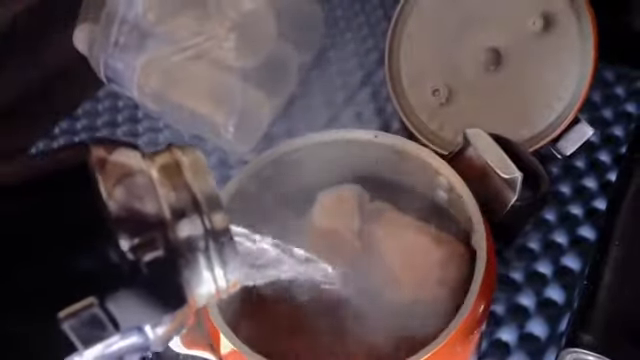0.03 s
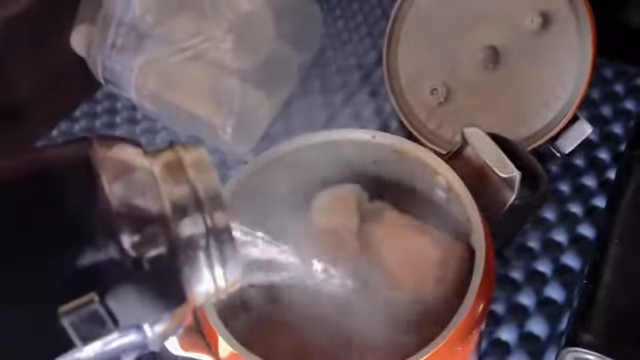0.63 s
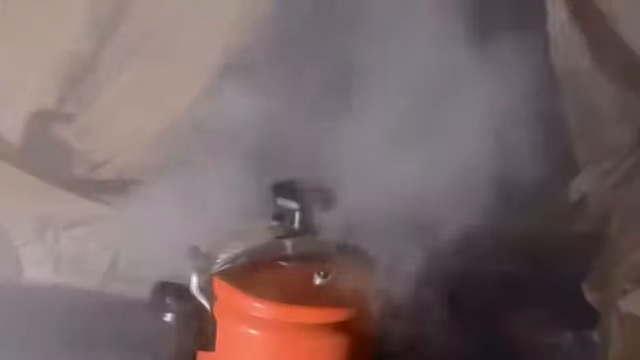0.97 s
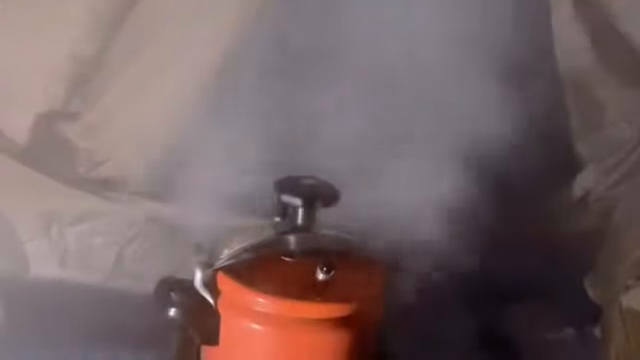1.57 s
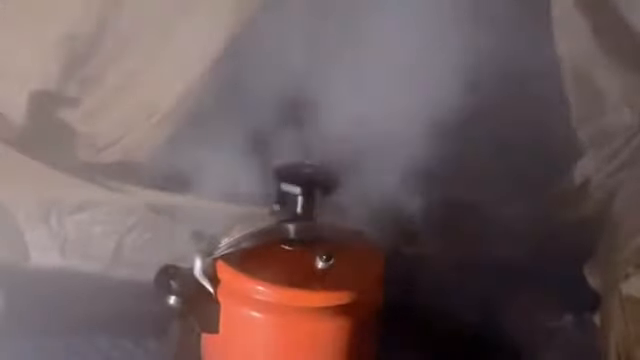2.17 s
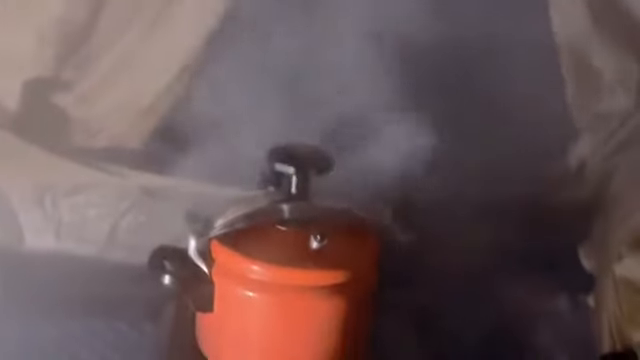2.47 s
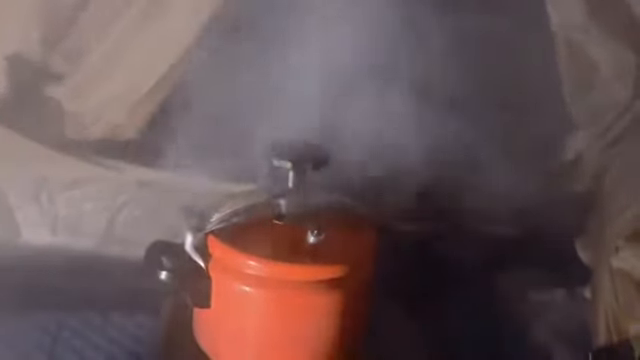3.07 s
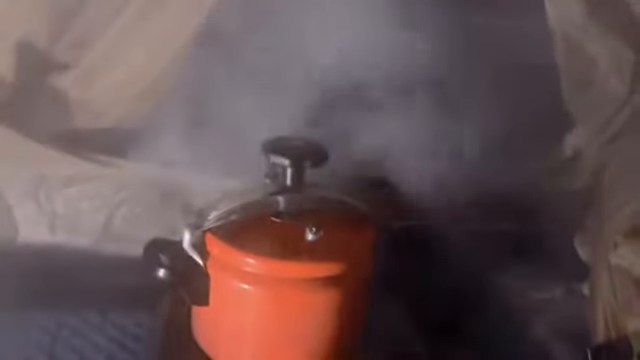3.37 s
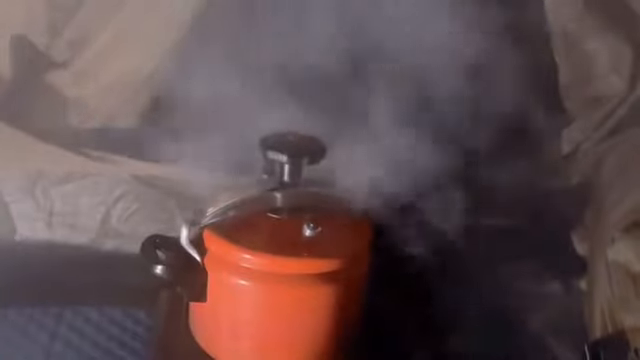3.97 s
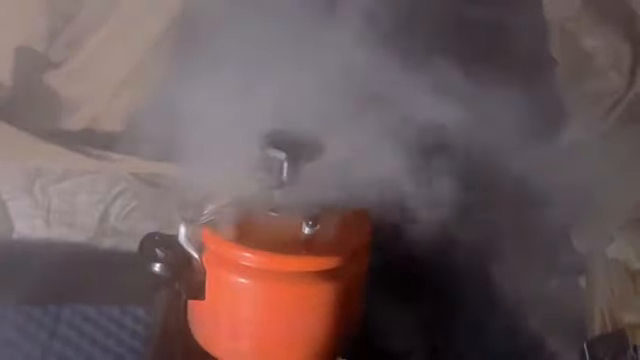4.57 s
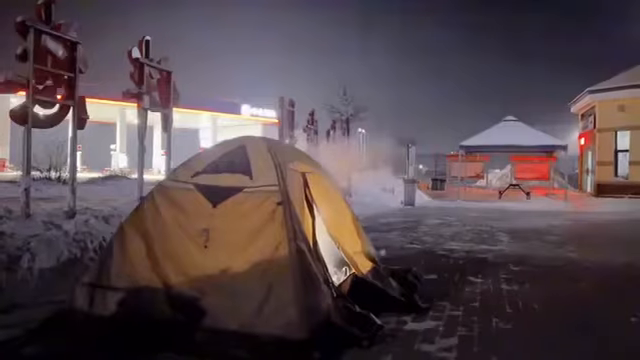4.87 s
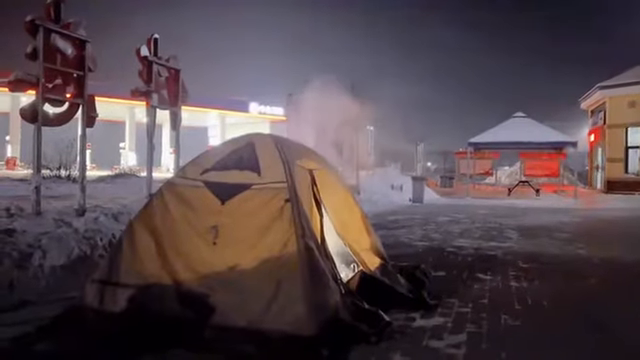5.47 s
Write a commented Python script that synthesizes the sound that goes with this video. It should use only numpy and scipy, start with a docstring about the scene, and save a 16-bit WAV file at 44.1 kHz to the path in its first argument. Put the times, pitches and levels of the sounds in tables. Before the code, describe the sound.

A brief pour of water splashes and bubbles into a pot on a rumbling stove, close to the microphone. It switches abruptly to the main sound, a sharp steam hiss from a pressure cooker inside a tent, pulsing unevenly as the valve weight rocks, with small wet sputters. The last second cuts outdoors to an uneven low throb, a wash like far traffic and a thin, wavering hiss.

```python
"""A small pressure cooker on a winter camp stove, heard close up, in three shots with hard cuts.
Water glugs and spatters into the open pot, its bubbles ringing over the stove's rumble.
The closed cooker then vents a bright, fluttering jet of steam under its weighted valve.
Last, the microphone is in the open air outside the tent: a low throb, a wash like distant
traffic and a faint hiss."""
import sys
import numpy as np
from scipy import signal
from scipy.fft import rfft, irfft, next_fast_len
from scipy.io import wavfile
from scipy.ndimage import uniform_filter1d, map_coordinates

SR = 44100
rng = np.random.default_rng(int(sys.argv[2]) if len(sys.argv) > 2 else 0)


def output_pcm(signal):
    """Save a mono or channel-first signal as 16-bit PCM at the path in sys.argv[1].

    Samples are clipped to [-1, 1] before scaling.
    """
    pcm = np.clip(np.atleast_2d(signal).T, -1, 1) * 32767
    wavfile.write(sys.argv[1], SR, np.round(pcm).astype(np.int16))


N = 242971
VENT_S, OUTSIDE_S = .8435, 4.732  # the two cuts
TOP_HZ = 13080
MID_ONLY = np.array([[1], [0]])

# resonances of the open pot and its water: pitch_hz, width_hz, level_db
POT_MODES = [(533, 42, 2.5), (710, 41, 4), (812, 80, -2), (1295, 51, 3), (1750, 69, -17), (2330, 42, -5),
             (2740, 55, -3.5), (3860, 440, -16.5)]


def amp(db):
    """Decibels to gain."""
    return 10 ** (np.asarray(db) / 20)


def unit(x):
    """Scale to rms 1."""
    return x / np.sqrt(np.mean(x ** 2) + 1e-20)


def clock():
    """The time of each sample."""
    return np.arange(N) / SR


def along(points, hz):
    """Interpolate (freq_hz, value) points on a log axis."""
    freqs, values = np.transpose(points)
    return np.interp(np.log(hz + 1), np.log(freqs + 1), values)


def curve(points):
    """Interpolate (time_s, value) points at every sample."""
    return np.interp(clock(), *np.transpose(points))


def swell(s, half_s):
    """A bell-shaped rise and fall around time s."""
    return np.exp(-((clock() - s) / half_s) ** 2)


def wobble(rate):
    """A smooth random curve, rate knots a second."""
    return map_coordinates(rng.standard_normal(int(N * rate / SR) + 4), [clock() * rate])


def noise():
    """Two unrelated white noises: mid and side."""
    return rng.standard_normal((2, N))


def filtered(x, response):
    """x times a response of frequency."""
    size = next_fast_len(N + SR // 2)
    return irfft(rfft(x, size) * response(np.fft.rfftfreq(size, 1 / SR)), size)[..., :N]


def coloured_noise(spectrum):
    """Mid and side noise shaped by (freq_hz, level_db) points, at rms 1."""
    return unit(filtered(noise(), lambda hz: amp(along(spectrum, hz)) * (hz < TOP_HZ)))


def resonate(x, modes):
    """x rung through (pitch_hz, width_hz, level_db) resonances, at rms 1."""
    return unit(filtered(x, lambda hz: sum(
        amp(db) * 1j * hz * width / (pitch ** 2 - hz ** 2 + 1j * hz * width)
        for pitch, width, db in modes)))


def steadied(x, span_s):
    """Even out swells slower than span_s."""
    power = uniform_filter1d(np.abs(signal.hilbert(x)) ** 2, max(int(span_s * SR), 1), axis=-1)
    return unit(x / np.sqrt(np.abs(power) + 1e-6))


def patchy(x, depth, size, blur):
    """Lay random patches of gain over x in time and frequency; depth is (freq_hz, depth_db)."""
    hz, _, spectra = signal.stft(x, SR, nperseg=size)
    field = uniform_filter1d(rng.standard_normal(spectra.shape[1:]), size=2, axis=0)
    field = unit(uniform_filter1d(uniform_filter1d(field, blur, axis=1), blur, axis=1))
    gain = amp(along(depth, hz)[:, None] * np.minimum(field, 1))
    gain /= np.sqrt(np.mean(gain ** 2, axis=1, keepdims=True))
    return signal.istft(spectra * gain, nperseg=size)[1][..., :N]


def spread(pair, width):
    """Mid and side to left and right; width is (freq_hz, side_gain_db)."""
    side = filtered(pair[1], lambda hz: amp(along(width, hz)))
    return np.array([pair[0] + side, pair[0] - side])


def leaned(pair, lean):
    """Tilt left against right by (freq_hz, left_minus_right_db) points."""
    return filtered(pair, lambda hz: amp(np.outer([.5, -.5], along(lean, hz))))


def add(track, s, sound):
    """Mix a sound in at time s."""
    part = track[..., max(round(s * SR), 0):][..., :sound.shape[-1]]
    part += sound[..., :part.shape[-1]]


def stove():
    """The stove rumbles unevenly under the open pot."""
    # the rumble's course: time_s, level_db
    rumble = [(0.0, -19), (0.314, -19), (0.36, -10), (0.466, -20.5), (0.576, -13.5), (0.69, -22.5),
              (0.71, -18), (0.84, -18.5)]
    # its colour: freq_hz, level_db
    spectrum = [(13, -43), (22, -24), (64, 4.5), (135, -15.5), (198, -16), (256, -16.5), (294, -16),
                (353, -22), (420, -22), (550, -25), (920, -120)]
    return amp(curve(rumble) + 1.9 * wobble(44)) * steadied(coloured_noise(spectrum), span_s=.032)


def vessel(hum_db=-27.5):
    """The air in the pouring vessel rings at one main pitch and swells with each gulp."""
    # the tone rises between gulps: time_s, pitch_hz
    pitch = [(.18, 290), (.225, 317), (.27, 293), (.46, 301.5), (.495, 292), (.555, 315), (.615, 292.6),
             (.735, 303.4), (.79, 291.4)]
    # gulps of air: time_s, level_db, half_length_s
    gulps = [(0.285, -13, 0.027), (0.408, -11.5, 0.072), (0.622, -7, 0.042), (0.745, -9.5, 0.014),
             (0.779, -10, 0.019), (0.836, -12, 0.018)]
    # the vessel's hollow: pitch_hz, width_hz, level_db
    modes = [(238, 13, 4), (294, 26, 5.5), (310, 3.3, -14)]
    tone = np.sin(2 * np.pi * np.cumsum(curve(pitch) + 3 * wobble(39.7)) / SR) * MID_ONLY
    breath = amp(-14) * steadied(resonate(noise(), modes), span_s=.024)
    level = amp(hum_db) + sum(amp(db - 6) * swell(s, half_s) for s, db, half_s in gulps)
    return level * (tone + breath)


def droplets(per_s, centre_hz, cycles, scatter_db, samples=400):
    """A random patter of tiny bubbles, each ringing for a few cycles; mid and side."""
    t = np.arange(samples) / SR
    when, size, place, tone = rng.random((int(per_s * VENT_S), 4)).T[..., None]
    hz = np.clip(centre_hz * 4 ** (tone - .5), 100, TOP_HZ)
    life = np.exp(-hz * t / cycles) * np.tanh(hz * t / 4) ** 2
    rings = amp(-scatter_db * np.log(size + .024)) * np.sin(2 * np.pi * hz * t) * life
    index = ((when * VENT_S * SR).astype(int) + np.arange(samples)).ravel()
    side_gain = 2 * np.sin(2 * np.pi * place)
    pair = np.array([np.bincount(index, (rings * gain).ravel(), N) for gain in (1, side_gain)])
    return pair / np.std(pair[0, :int(VENT_S * SR)])


def stream():
    """The falling water churns the pot and throws up a fizzing spray."""
    # the stream builds up and slackens: time_s, flow_db
    flow = [(0, -2.5), (.18, -1), (.45, 1), (.62, 4), (.72, -2), (.84, -1)]
    # the fizz's colour: freq_hz, level_db
    spectrum = [(900, 4), (1900, 1.5), (2800, -2.5), (3400, -23), (4400, 2.5), (5700, -3), (7500, 2),
                (10000, -10.5), (12000, 4.5), (13000, -2.5)]
    churn = amp(-28.5) * resonate(noise() * amp(6.7 * np.tanh(wobble(130.6))), POT_MODES)
    plinks = amp(-5) * droplets(per_s=360, centre_hz=2722, cycles=23, scatter_db=-.5)
    glugs = amp(-32) * droplets(per_s=110, centre_hz=716, cycles=3.3, scatter_db=1, samples=1500)
    # clouds of fine bubbles come and go within milliseconds, each at its own pitch
    clouds = patchy(coloured_noise(spectrum), [(1500, 7.1), (5000, 7), (12000, 7)], size=128, blur=5)
    fizz = amp(3) * unit(clouds * amp(7.4 * np.tanh(wobble(108.6))))
    spray = amp(-33.5) * (plinks + fizz)
    return amp(curve(flow)) * (churn + glugs + spray)


def burst(hz, octaves, t60, rise_s=.0012):
    """A puff of noise around hz that swells quickly and dies; mid and side."""
    t = np.arange(SR // 4) / SR
    freqs = np.fft.rfftfreq(len(t), 1 / SR)
    band = 1 / (1 + (np.log2((freqs + 1) / hz) / octaves) ** 2)
    puff = unit(irfft(rfft(rng.standard_normal((2, len(t)))) * band, len(t)))
    return puff * amp(-60 * t / t60) * np.tanh(t / rise_s)


def cluster(hz, scatter_s=.0016, octaves=.4, cycles=12, rise=.05, count=16):
    """A handful of fine bubbles, born around the middle of 60 ms and rising in pitch; mid and side."""
    when, tone, place = rng.standard_normal((3, count, 1))
    age = np.maximum(np.linspace(-.03, .03, int(.06 * SR)) - scatter_s * when, 0)
    turns = age * np.minimum(hz * 2 ** (octaves * tone), TOP_HZ)
    phase = 2 * np.pi * turns * (1 + rise * np.tanh(turns / cycles))
    rings = np.sin(phase) * np.exp(-turns / cycles) * np.tanh(turns / 2)
    return np.array([rings.sum(0), (place * rings).sum(0)]) / np.std(rings.sum(0))


def splashes(hardness=.3, lag_s=.002):
    """A drop lands with a tick, louder the harder it hits, and drives fine bubbles under the surface."""
    # drops slapping the pot: time_s, level_db, bubble_pitch_hz
    drops = [(.0218, -25, 3216), (0.0458, -7.5, 4230), (0.1073, -8.5, 4030), (.123, -11.5, 4520),
             (0.142, -13.5, 4060), (.192, -15, 4300), (.2274, -14.5, 4680), (0.249, -3.5, 4150),
             (.259, -9.5, 4610), (.2987, -14, 4130), (0.344, -13, 5700), (0.3558, -8.5, 4360),
             (0.378, -21, 6000), (0.449, -16, 2890), (.455, -31, 4600), (0.5183, -12, 5310),
             (0.5466, -13, 3770), (.584, -18, 4660), (0.597, -10.5, 2960), (0.6713, -9, 4130),
             (0.725, -14.5, 6560), (.7517, -18, 4840), (0.7656, -2.5, 4760), (.79, -12.5, 2960)]
    out = np.zeros((2, N))
    typical_db = np.mean([db for _, db, _ in drops])
    for s, db, hz in drops:
        tick = burst(hz=6000, octaves=1.1, t60=.011, rise_s=.0008)
        add(out, s, amp(db - 8 + hardness * (db - typical_db)) * tick)
        fine = cluster(hz)
        add(out, s + lag_s - fine.shape[1] / SR / 2, amp(db - 23) * fine)
    return out


def bubbles(glide=-.042, attack_s=.0011):
    """Each pocket of air swells, rings and slides down in pitch, jostled by the stream."""
    # large bubbles: start_s, level_db, pitch_hz, t60_s
    pockets = [(.047, -7.5, 740, 0.01), (.052, -15, 1256, 0.046), (.103, -17, 890, 0.022),
               (.123, -14.5, 580, 0.022), (.1427, -9.5, 593, 0.024), (.1607, -14.5, 690, .022),
               (.164, -16, 1300, 0.033), (.1958, -12, 620, 0.025), (.2263, -11, 570, 0.036),
               (.249, -12, 780, 0.021), (.256, -19, 1300, 0.016), (.26, -12.5, 710, 0.018),
               (.2993, -7.5, 590, 0.015), (.312, -12.5, 2270, 0.05), (.337, -15.5, 725, .026),
               (.3555, -15, 660, .022), (.4147, -13.5, 670, 0.028), (.435, -15, 710, 0.029),
               (.435, -18, 2780, 0.022), (.453, -8, 510, 0.031), (.5345, -13, 750, .035),
               (.5494, -10, 600, .02), (.597, -13.5, 2520, .02), (.622, -10.5, 530, 0.03),
               (.6485, -13.5, 2750, 0.02), (.649, -16, 1300, 0.038), (.671, -9.5, 680, 0.017),
               (.675, -20, 1311, 0.018), (.7118, -14, 559.6, 0.024), (.791, -16.5, 670, 0.015),
               (.817, -22, 560, 0.024), (.818, -17.5, 1760, 0.028)]
    out, t = np.zeros((2, N)), np.arange(SR // 10) / SR
    jostle = .43 * wobble(330)
    for (s, db, hz, t60), place in zip(pockets, rng.standard_normal(len(pockets))):
        slide = 1 + glide * (2 * np.tanh(4 * t / t60) - 1)
        life = (1 - np.exp(-(t / attack_s) ** 2)) * amp(-60 * t / t60)
        shake = np.sqrt(hz / 600) * jostle[int(s * SR):][:len(t)]
        ring = np.sin(2 * np.pi * np.cumsum(hz * slide) / SR + shake) * life / life.max()
        add(out, s, np.outer([1, .074 + place / 4], amp(db) * ring))
    return out


def in_pot(x, wet_db=-9):
    """The pot's resonances keep each bubble sounding a little longer."""
    return x + amp(wet_db) * np.std(x[0]) * resonate(x, POT_MODES)


def pouring():
    """Close to the open pot: water pours in from a humming vessel, over the stove."""
    # stereo width: freq_hz, side_gain_db
    width = [(60, -29), (300, -3.5), (500, -11.5), (750, -5.5), (1300, -4.5), (1850, -10), (2800, -3.5),
             (3800, -3), (4700, -9), (7000, -8), (10000, 9), (13000, -14)]
    # stereo balance: freq_hz, left_minus_right_db
    lean = [(100, -0.5), (300, -3), (520, 0), (750, 4.5), (1300, -1.5), (2500, 1), (4200, 3), (7000, 0)]
    mix = stove() + vessel() + stream() + in_pot(bubbles()) + splashes()
    return leaned(spread(mix, width), lean)


def valve(rock_db=.47, flutter_db=.78):
    """The weight rocks, rattles and lifts: the flow, and the puffs in rush and top hiss, all in dB."""
    # the weight drops back and throttles the jet: time_s, depth_db, half_length_s
    chokes = [(1.013, 2.2, 0.038), (1.094, 2, 0.022), (1.147, 4.5, 0.012), (1.21, 4, 0.015),
              (1.273, 2.5, 0.018), (1.346, 3.5, 0.008), (1.424, 4.5, 0.04), (1.526, 5.5, 0.051),
              (1.57, 3, 0.011), (1.645, 10, 0.021), (1.717, 6, 0.016), (1.792, 4.5, 0.019),
              (1.924, 2.7, 0.008), (1.997, 0.9, 0.06), (2.116, 4, 0.027), (2.18, 1, 0.011),
              (2.465, 3.5, 0.025), (2.522, 2.5, 0.014), (2.56, 10.5, 0.022), (2.64, 4.5, 0.028),
              (2.693, 2.0, 0.008), (2.8, 2.5, 0.012), (2.859, 2.8, 0.011), (2.924, 5.5, 0.01),
              (2.987, 2.5, 0.023), (3.166, 5, 0.03), (3.419, 5.5, 0.018), (3.503, 11, 0.018),
              (3.59, 10.8, 0.019), (3.674, 3.5, 0.013), (3.835, 5, 0.016), (3.897, 0.5, 0.008),
              (3.94, 6, 0.048), (4.34, 1, 0.0086), (4.406, 7.1, 0.018), (4.467, 3.5, 0.012),
              (4.517, 4, 0.018), (4.589, 2.5, 0.01)]
    # it lifts and lets out a puff: time_s, rush_db, top_hiss_db, half_length_s
    puffs = [(0.992, 1, 0.0, 0.022), (1.116, 1.5, 1, 0.014), (1.22, 1.4, 0.5, 0.06),
             (1.442, 2.5, -2, 0.014), (1.495, 3.5, 4, 0.014), (1.52, 2, -1.5, 0.022), (1.681, 3, 1, 0.012),
             (2.38, 1, 1, 0.03), (2.712, 2.1, 0, 0.011), (2.966, 1, 1, 0.008), (3.047, -0.1, 0.5, 0.06),
             (3.154, 1.8, 1, 0.028), (3.248, 1.3, 1, 0.013), (3.455, -2, 1.5, 0.022),
             (3.635, 1.2, 0.5, 0.017), (3.777, 1.2, 2, 0.014), (3.926, 2, -0.5, 0.018),
             (3.992, 3, 3.5, 0.015), (4.06, 1.5, 1, 0.031), (4.155, 1.5, 3, 0.018), (4.481, 1, 1.5, 0.06),
             (4.682, 0, 2.5, 0.022)]
    choke_db = sum(depth * swell(s, half_s) for s, depth, half_s in chokes)
    rush_db, top_db = sum(np.outer([rush, top], swell(s, half_s)) for s, rush, top, half_s in puffs)
    flow_db = rock_db * wobble(38) + flutter_db * wobble(80) - choke_db
    return flow_db, rush_db, top_db


def echoed(x, strength, span_s=.0042, drift_s=.00008, contrast=1.32, count=9):
    """Close reflections with drifting delays cut moving notches; strength is (freq_hz, echo_gain)."""
    hz, t, spectra = signal.stft(x, SR, nperseg=1024, noverlap=768)
    frames = np.minimum((t * SR).astype(int), N - 1)
    paths = (np.arange(count) + 1 + rng.random(count)) / count
    delays = [span_s * path + drift_s * wobble(3.5)[frames] for path in paths]
    echoes = sum(np.exp(-2j * np.pi * np.outer(hz, delay)) for delay in delays) / np.sqrt(count)
    gain = np.tanh(np.abs(1 + along(strength, hz)[:, None] * echoes) / 2) ** contrast
    gain /= np.sqrt(np.mean(gain ** 2, axis=1, keepdims=True))
    return signal.istft(spectra * gain, SR, nperseg=1024, noverlap=768)[1][..., :N]


def steam_jet(split_hz=8000, rush_share=.86):
    """Steam rushes past the rocking weight, which throttles the top hiss most."""
    # the jet's broad colour: freq_hz, level_db
    spectrum = [(200, -17), (700, -19.5), (1100, -18), (1400, -16), (1850, -13.5), (2450, -12.5),
                (2900, -11), (4200, -9.5), (5400, -11), (6500, -8), (9000, -3), (10500, 0.5), (12000, 5),
                (13000, 5.5)]
    # its narrow peaks and dips over the lid: centre_hz, width_hz, gain_db
    lid = [(1120, 90, -5), (1400, 130, 2), (1850, 150, -3), (2120, 170, 2), (2570, 170, -4),
           (2830, 260, 1.7), (3100, 90, -2.5), (3230, 110, 2.5), (3470, 160, -4), (4330, 110, -2.5),
           (4530, 160, 1.5), (5520, 200, -3), (6080, 220, 2.5), (6380, 240, -2.5), (6640, 140, 2.5),
           (7520, 180, -2)]
    flow_db, rush_puff_db, top_puff_db = valve()
    jet = filtered(coloured_noise(spectrum), lambda hz: amp(sum(
        db * np.exp(-(2 * (hz - centre) / width) ** 2) for centre, width, db in lid)))
    # the turning weight swings the jet, so its reflections off the lid and the tent keep shifting
    jet = echoed(jet, strength=[(1000, .35), (2500, .77), (6000, .98), (9000, .72), (12000, .36)])
    below_split = filtered(jet, lambda hz: 1 / (1 + (hz / split_hz) ** 12))
    rush = amp(-25 + rush_share * flow_db + rush_puff_db) * unit(below_split)
    top_hiss = amp(-19.5 + flow_db + top_puff_db) * unit(jet - below_split)
    return rush + top_hiss


def burner():
    """The burner drones below the closed cooker."""
    # the drone's colour: freq_hz, level_db
    spectrum = [(13, -58), (22, -5), (27, -30), (29, -19), (39, -25), (54, 3), (70, 1), (87, -11.5),
                (233, -18), (325, -34.5), (380, -33), (490, -39), (840, -120)]
    return amp(-33.5 + .71 * wobble(6.24)) * steadied(coloured_noise(spectrum), span_s=.04)


def spits():
    """Condensed water sputters through the valve."""
    # slugs of water: start_s, level_db, centre_hz, t60_s
    slugs = [(1.065, -23, 2800, 0.079), (2.13, -20.5, 2770, .097), (2.739, -21, 950, 0.04),
             (2.954, -20, 2900, .063), (3.224, -19, 5500, 0.3), (3.921, -29, 4500, 0.069),
             (3.988, -24, 5030, 0.15), (4.385, -24, 2800, 0.18)]
    out = np.zeros((2, N))
    for s, db, hz, t60 in slugs:
        add(out, s, amp(db - 4) * burst(hz, octaves=.65, t60=t60))
    return out


def venting():
    """Close to the closed cooker in the tent: the spitting jet over the burner."""
    # stereo width: freq_hz, side_gain_db
    width = [(60, -23), (260, -4), (850, -6), (1550, 1), (1850, -14), (2150, -3), (2450, -6), (3250, -1),
             (4080, -15), (5000, -5), (5600, -1), (6700, -7.5), (8000, -3), (8900, 3), (10000, 4.5),
             (11800, -2), (12700, -10), (13000, -22)]
    # stereo balance: freq_hz, left_minus_right_db
    lean = [(60, 2), (98, -3), (160, -0.5), (260, -5.5), (430, 2), (710, 2), (1170, 0.5), (1910, 1),
            (3130, 3), (5130, 1), (8420, 0.0), (13800, 0.0)]
    return leaned(spread(steam_jet() + burner() + spits(), width), lean)


def throb(pitch_hz=59, idle_db=-27):
    """An uneven low throb, as of an idling engine."""
    # its swells: time_s, level_db, half_length_s
    beats = [(4.756, -22, 0.021), (4.866, -19, 0.014), (4.92, -15, 0.01), (4.988, -15, 0.015),
             (5.06, -15, 0.038), (5.115, -27, .016), (5.196, -29, 0.022), (5.257, -19, 0.022),
             (5.315, -18, 0.013), (5.35, -14, 0.023), (5.422, -16, 0.012), (5.505, -5, 0.025)]
    # its rumble: freq_hz, level_db
    spectrum = [(12, -42), (20, -20), (43, -10), (64, 7), (155, -18), (260, -22), (340, -57), (570, -120)]
    drone = np.sin(2 * np.pi * np.cumsum(pitch_hz + 4 * wobble(12)) / SR) * MID_ONLY
    rumble = steadied(coloured_noise(spectrum), span_s=.042)
    level = amp(idle_db) + sum(amp(db) * swell(s, half_s) for s, db, half_s in beats)
    return level * (amp(-1) * drone + amp(-9.5) * rumble)


def traffic(start_db=-30.5, rise_db_per_s=7):
    """The wash of a distant road grows louder from the cut onwards."""
    # the wash's colour: freq_hz, level_db
    spectrum = [(25, -10), (76, 1), (130, 1.5), (309, -9), (350, -8.5), (400, -13), (465, -10.5),
                (560, -15.5), (929, -14), (1090, -16.5), (1380, -23), (2500, -32), (3250, -41),
                (5500, -120)]
    level_db = start_db + rise_db_per_s * np.maximum(clock() - OUTSIDE_S, 0) + wobble(25)
    return amp(level_db) * coloured_noise(spectrum)


def far_hiss():
    """A faint hiss wavers in the distance."""
    # its course: time_s, level_db
    level = [(4.76, -36), (5.1, -34), (5.15, -37.5), (5.35, -36), (5.38, -30), (5.45, -30.3), (5.48, -35.5)]
    # its colour: freq_hz, level_db
    spectrum = [(1000, -24), (1600, -10), (2600, -4), (3400, -5), (4500, 1), (6000, -3.5), (7500, 3),
                (9000, -2.5), (13000, 2.5)]
    gain = amp(curve(level) + 1.1 * wobble(11) + 1.3 * wobble(50))
    return gain * patchy(coloured_noise(spectrum), [(2000, 3.8), (12000, 3)], size=1024, blur=6)


def outdoors():
    """The open air outside the tent."""
    # stereo width: freq_hz, side_gain_db
    width = [(60, -15), (300, -11.5), (800, -4), (1400, 3.5), (2000, -28), (3000, -49), (4400, -30),
             (5400, 0), (7000, -10), (9500, 7.5), (11000, 3), (13000, -16)]
    return spread(throb() + traffic() + far_hiss(), width)


def scene():
    """The three shots follow one another with hard cuts."""
    vent = np.clip((clock() - VENT_S) / .001 + .5, 0, 1)
    outside = np.clip((clock() - OUTSIDE_S) / .006 + .5, 0, 1)
    return (1 - vent) * pouring() + (vent - outside) * venting() + outside * outdoors()


def record(dry, ceiling=.97):
    """The camera's microphone rounds off the highest peaks and keeps nothing above its band limit."""
    rounded = dry / (1 + np.abs(dry / ceiling) ** 6) ** (1 / 6)
    return filtered(rounded, lambda hz: np.clip((TOP_HZ - hz) / 100 + .5, 0, 1))


dry = scene()
out = record(dry)
output_pcm(out)
```